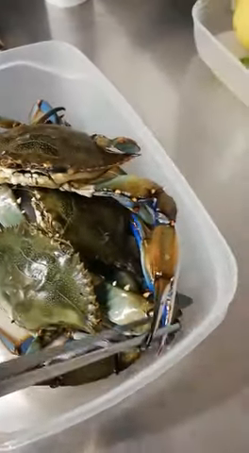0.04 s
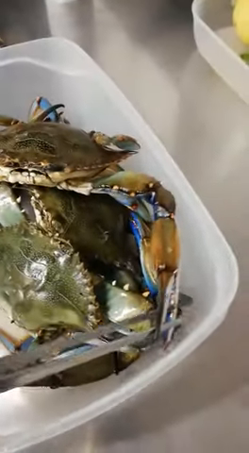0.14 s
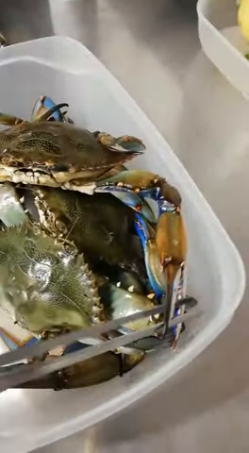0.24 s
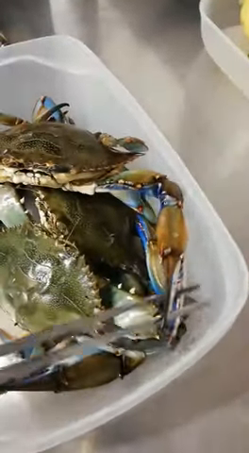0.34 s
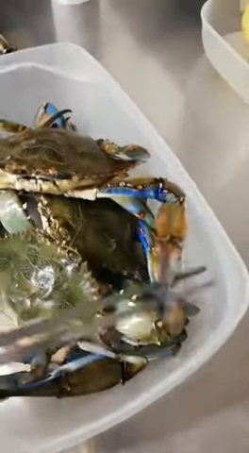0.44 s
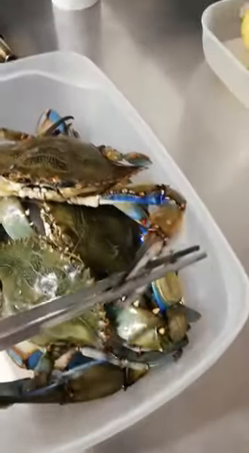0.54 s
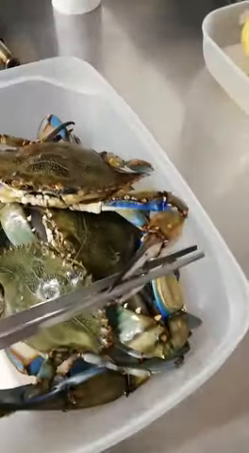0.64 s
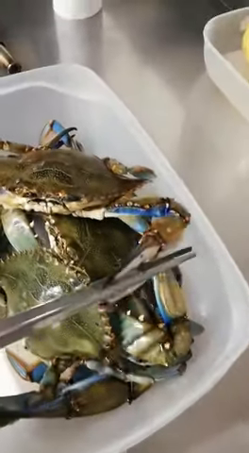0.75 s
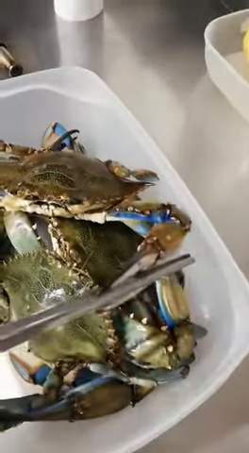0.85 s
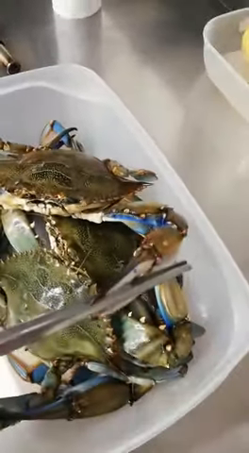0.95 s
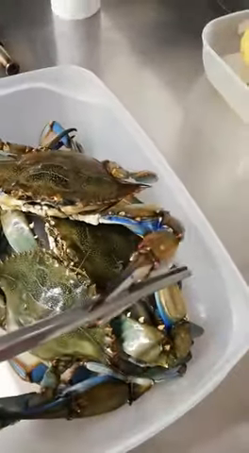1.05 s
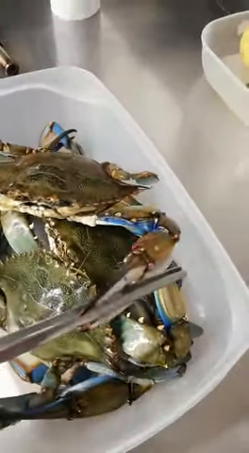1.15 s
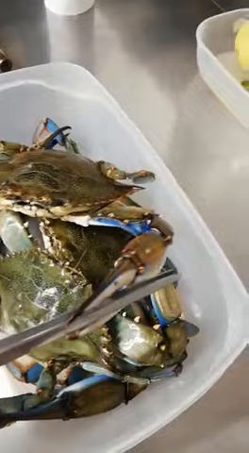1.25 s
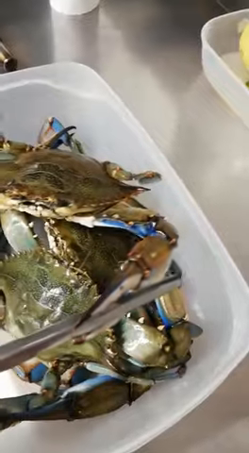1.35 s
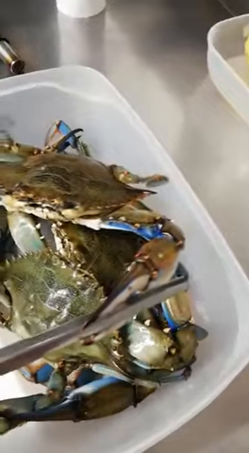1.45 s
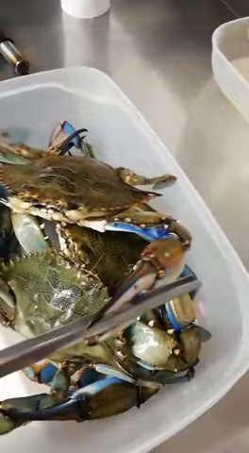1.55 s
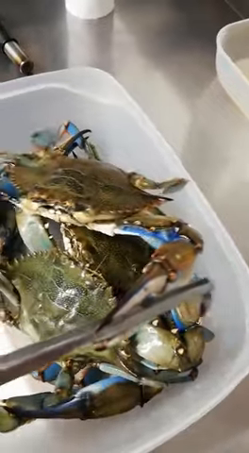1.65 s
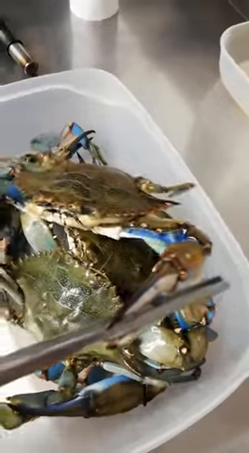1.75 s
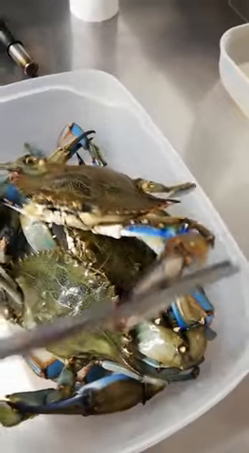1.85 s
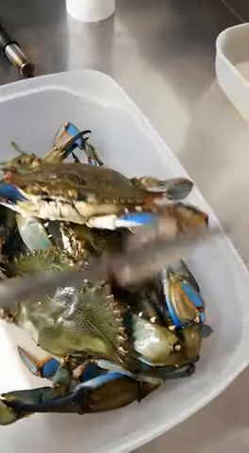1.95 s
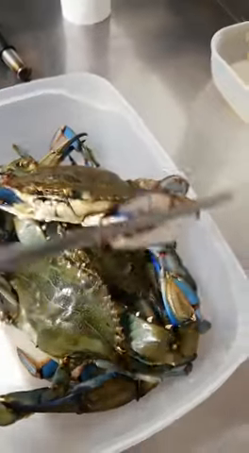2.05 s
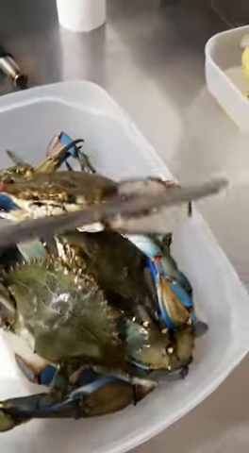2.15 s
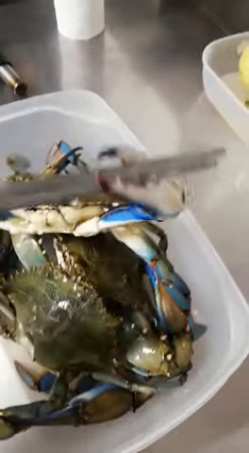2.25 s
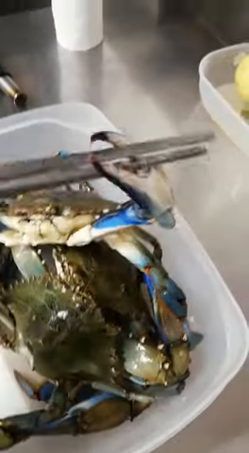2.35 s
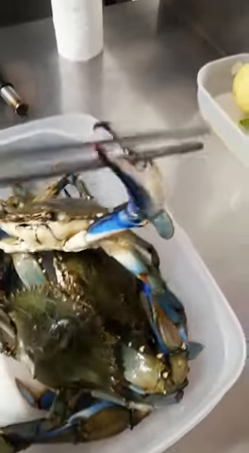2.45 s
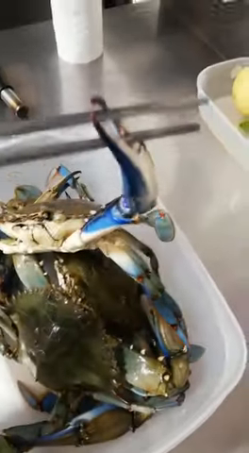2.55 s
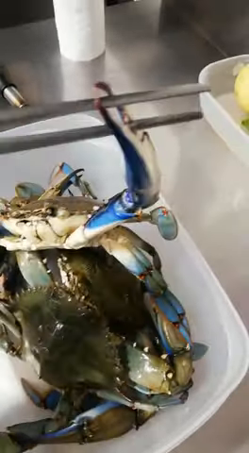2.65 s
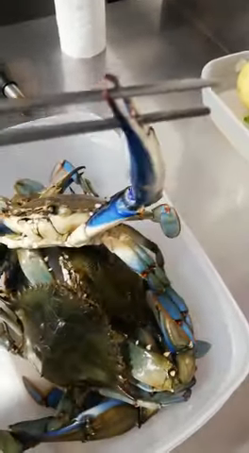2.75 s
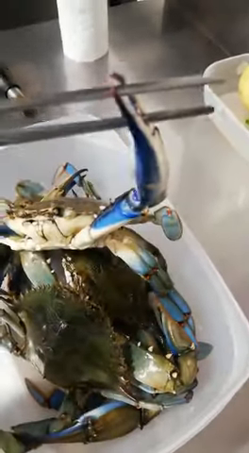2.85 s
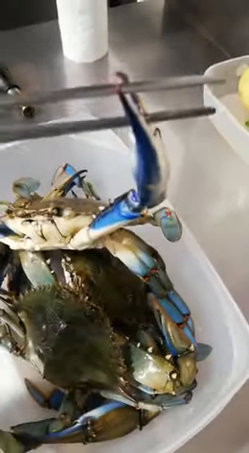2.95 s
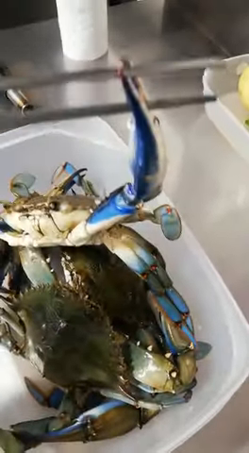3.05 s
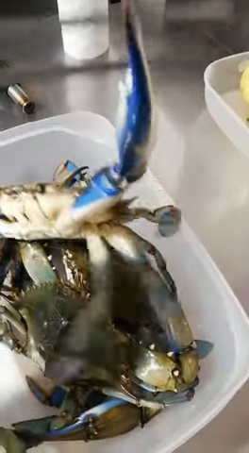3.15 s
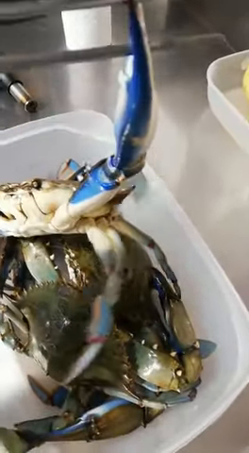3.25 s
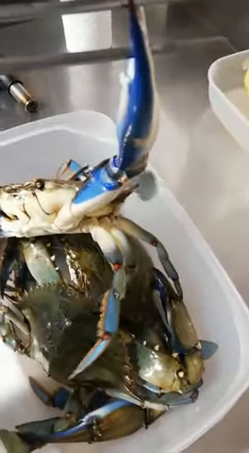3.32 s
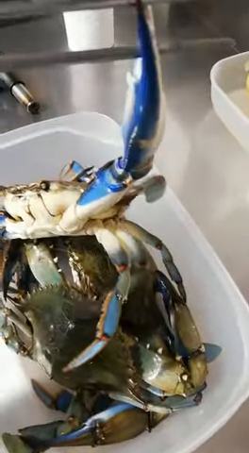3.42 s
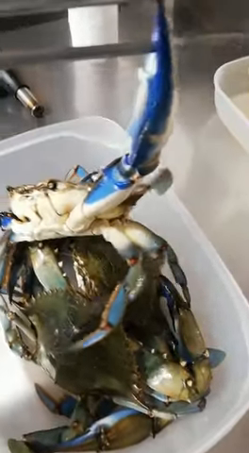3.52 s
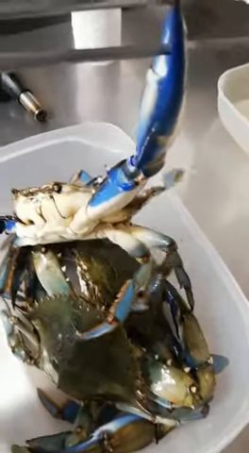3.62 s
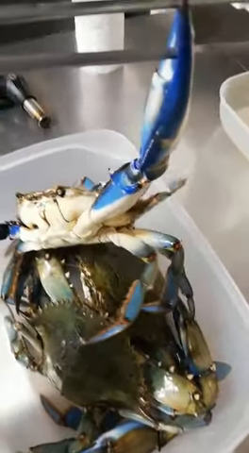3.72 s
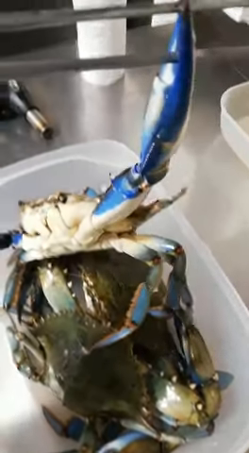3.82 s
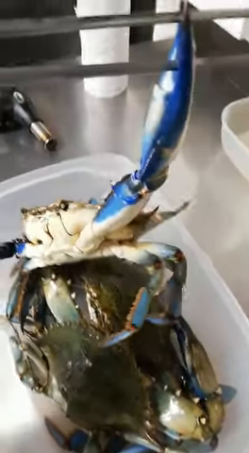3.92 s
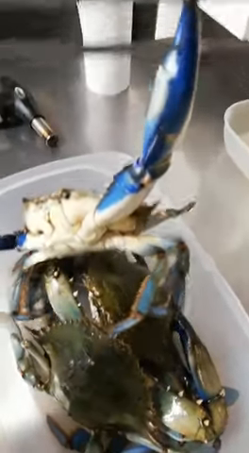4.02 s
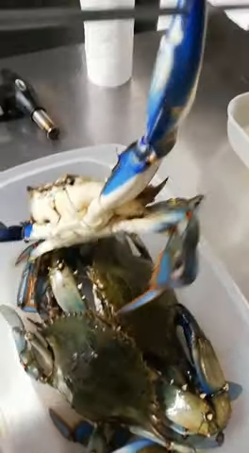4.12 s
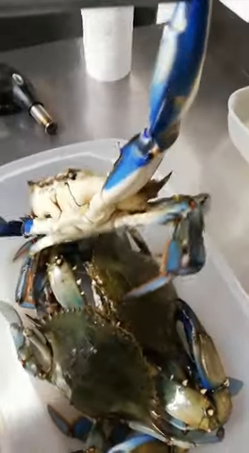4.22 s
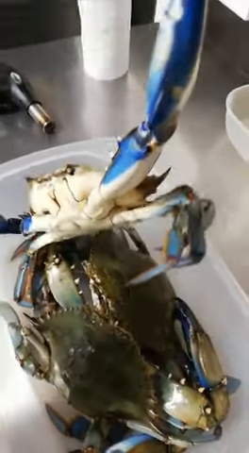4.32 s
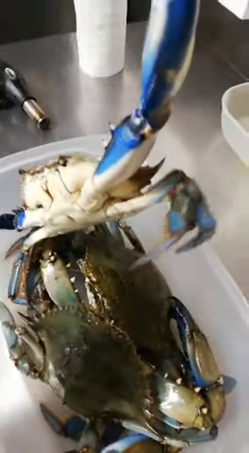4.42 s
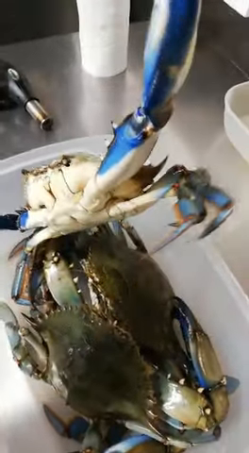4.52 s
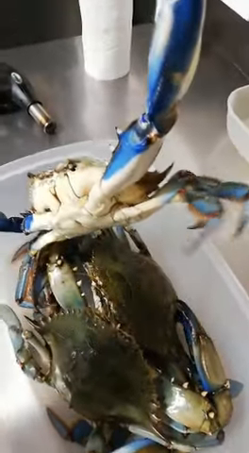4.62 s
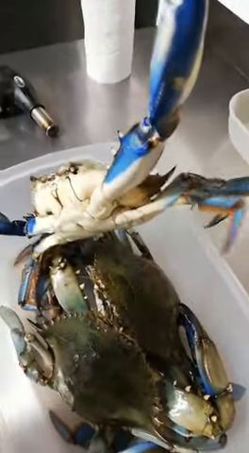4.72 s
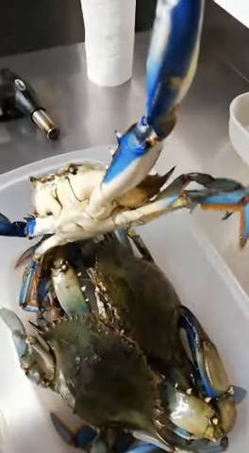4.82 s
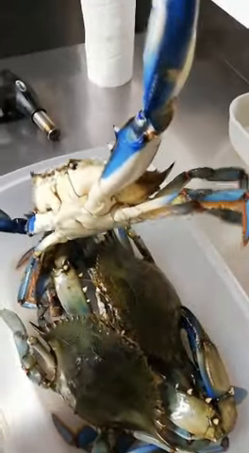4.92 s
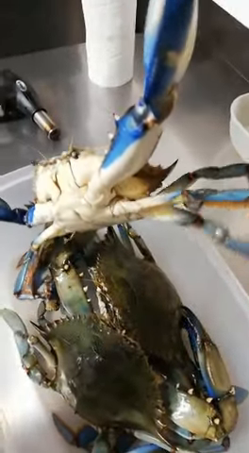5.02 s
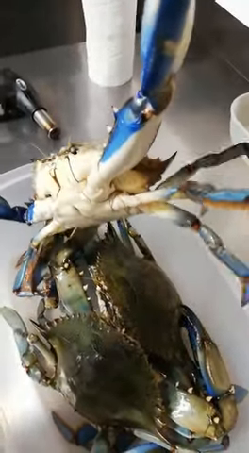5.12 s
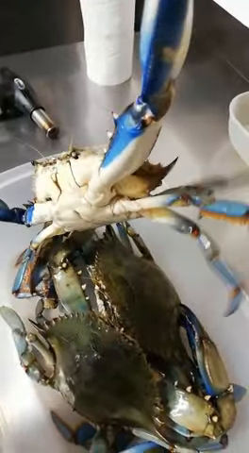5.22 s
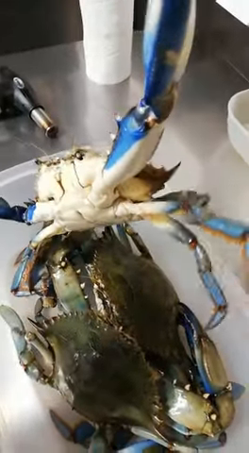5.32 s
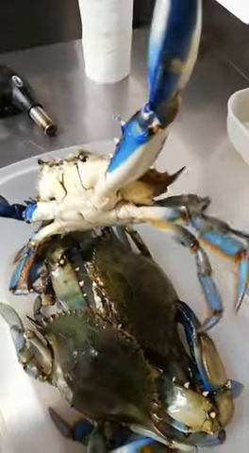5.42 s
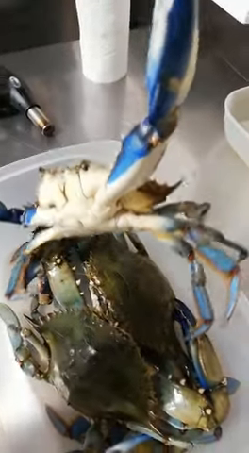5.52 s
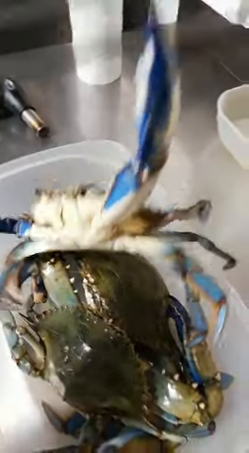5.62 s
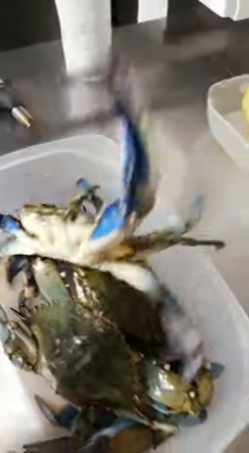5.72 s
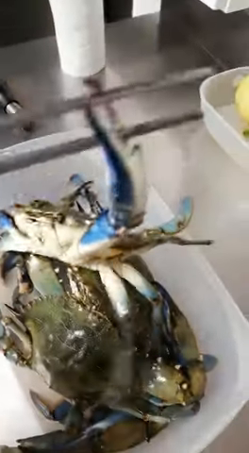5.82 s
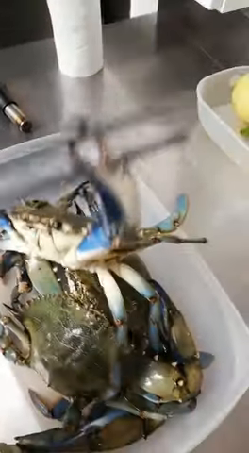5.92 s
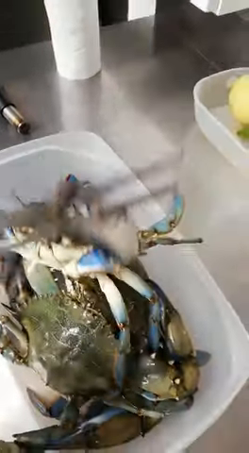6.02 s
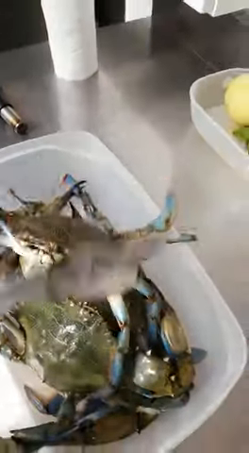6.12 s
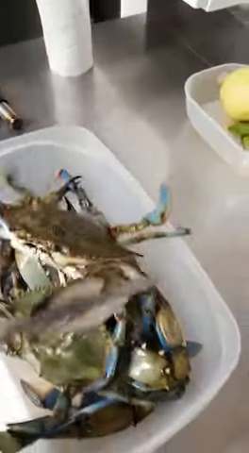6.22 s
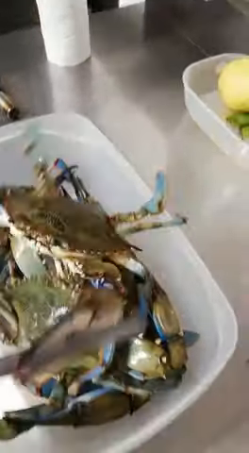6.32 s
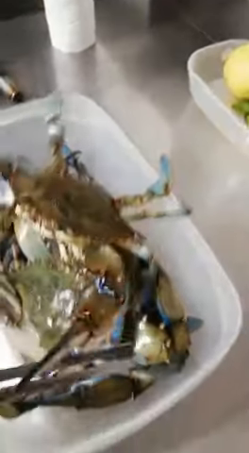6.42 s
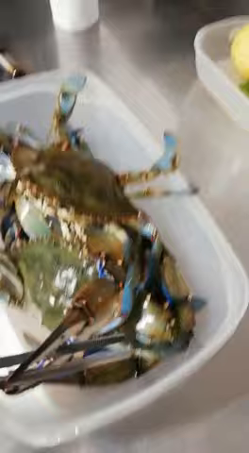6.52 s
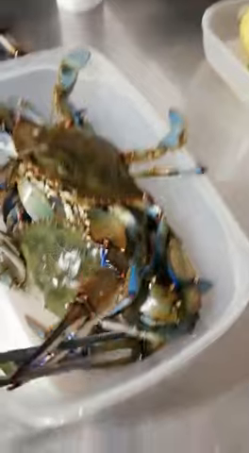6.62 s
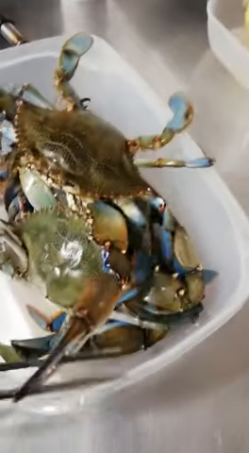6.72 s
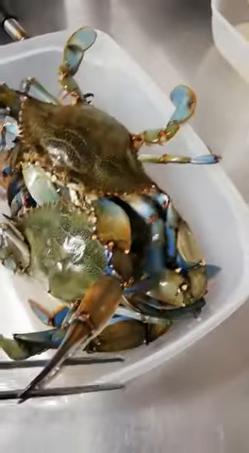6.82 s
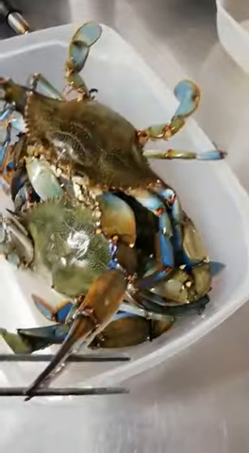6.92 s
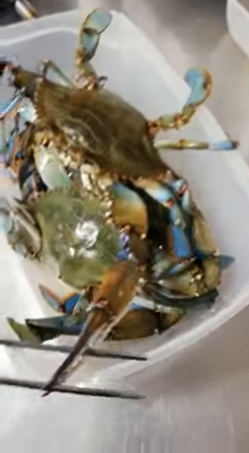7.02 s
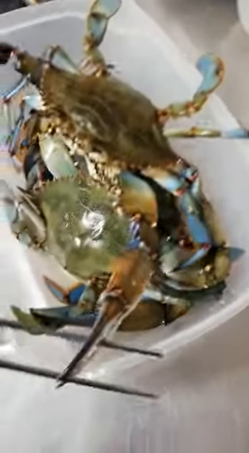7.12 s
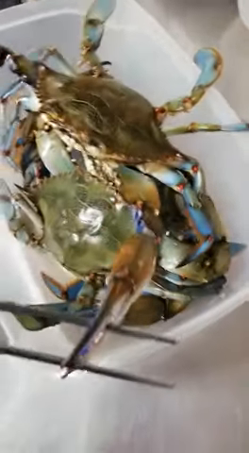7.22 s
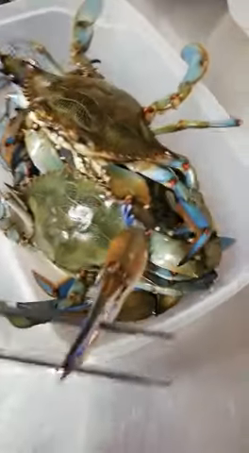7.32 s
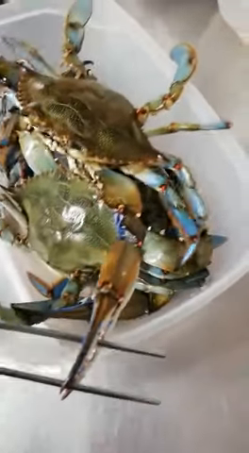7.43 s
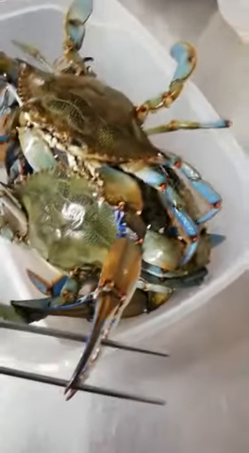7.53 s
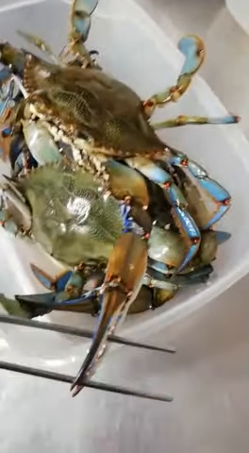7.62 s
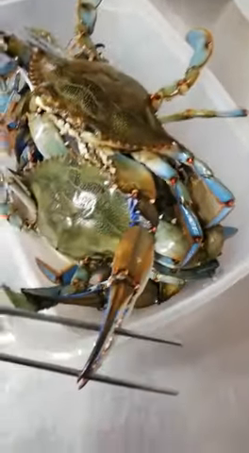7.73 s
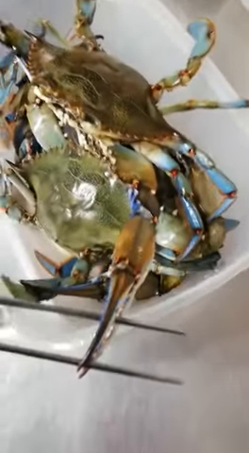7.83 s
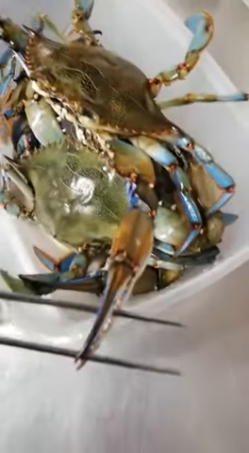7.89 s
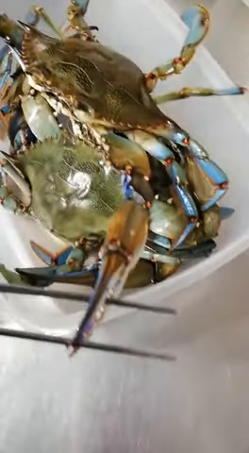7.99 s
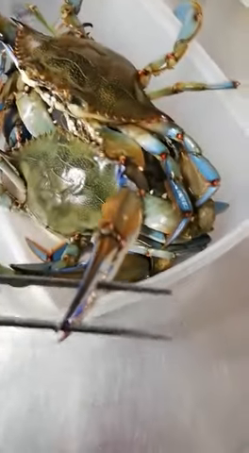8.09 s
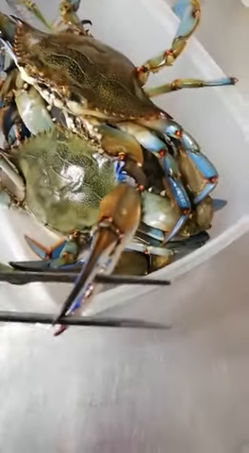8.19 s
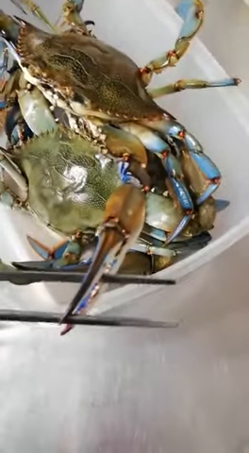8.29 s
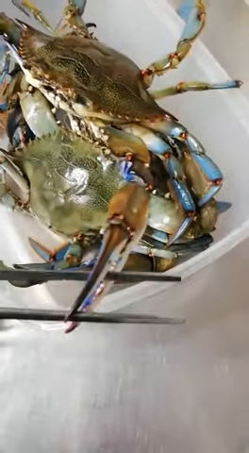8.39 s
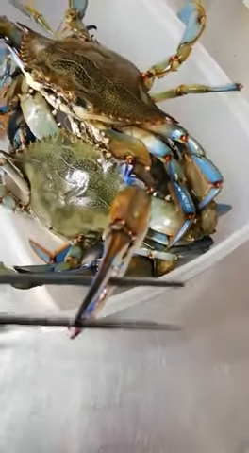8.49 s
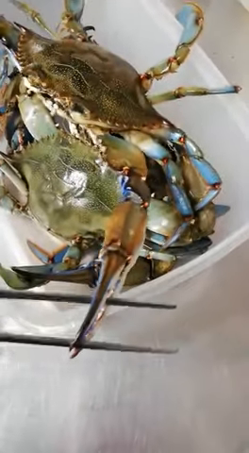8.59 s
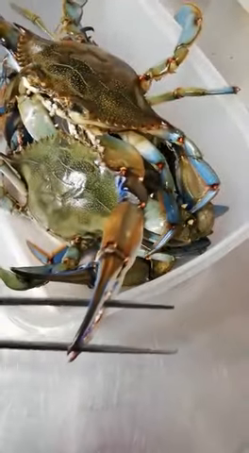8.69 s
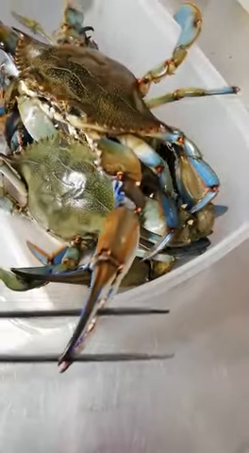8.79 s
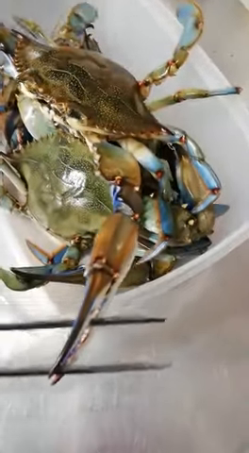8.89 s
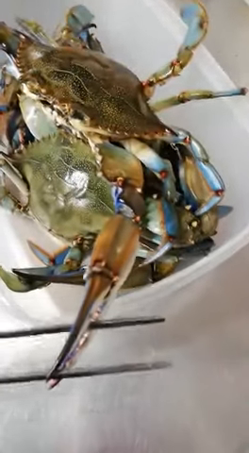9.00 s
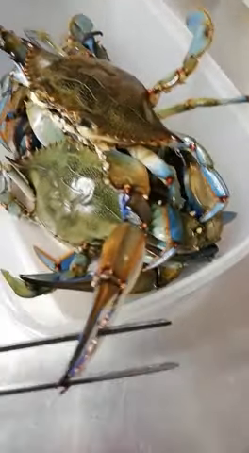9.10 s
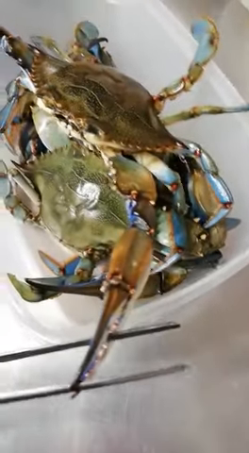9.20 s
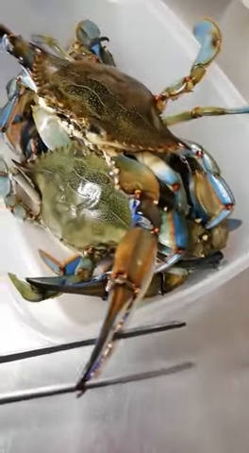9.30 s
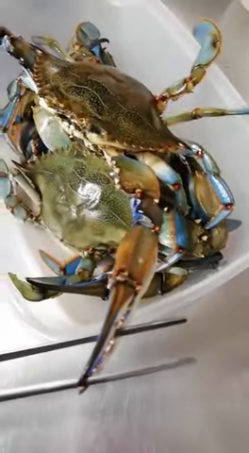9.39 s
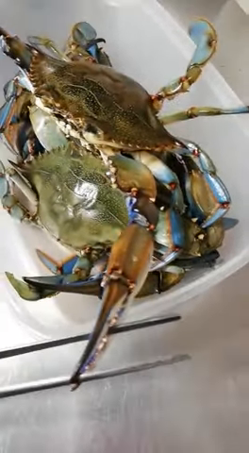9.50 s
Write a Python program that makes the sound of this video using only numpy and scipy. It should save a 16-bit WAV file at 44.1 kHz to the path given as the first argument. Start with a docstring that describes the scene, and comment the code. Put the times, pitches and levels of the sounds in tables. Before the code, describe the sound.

Live crabs shift in a plastic tub on a steel counter, heard close up. An opening knock and scratchy metallic tong slips give way to small shell taps, sharp clicks and short dry leg drags. The hardest clack comes past the middle, followed by sparse hollow thuds. Fine bubbling froth and low fridge hum continue, with short room echoes.

```python
"""Crab shells knock, clack and scrape on a plastic tub as live crabs are shifted about on a steel counter.
Blows and rubs are short bursts of shaped noise that shake the tub; its ringing is a set of fading tones.
Steel tongs tick and rasp against a claw in small jerks, and wet mouthparts pop as brief blips of noise.
A refrigerator hums in the small, hard room: wavering tones over a steady rush of noise, with room echoes."""
import sys
import numpy as np
from scipy import signal
from scipy.fft import rfft, irfft
from scipy.io import wavfile
from scipy.ndimage import uniform_filter1d

SR = 44100
rng = np.random.default_rng(int(sys.argv[2]) if len(sys.argv) > 2 else 0)


def put_to_file(sound):
    """Save the sound as 16-bit audio at rate SR, in the file named by the first command-line argument."""
    columns = np.atleast_2d(sound).T  # one column per channel
    safe = np.clip(columns, -1, 1)
    whole_steps = np.round(safe * 32767)
    wavfile.write(sys.argv[1], SR, whole_steps.astype(np.int16))


N = 421145  # length of the scene in samples
SIZE = 8192  # length of one short burst in samples
T = np.arange(SIZE) / SR  # time within a burst, in seconds
TOP_HZ = 16200  # highest treble kept

# Shell striking plastic: start_s, level_db, pitch_hz of the struck patch, click_db relative to the blow
KNOCK_EVENTS = [(0.047, -10, 1660, -10), (0.075, 3, 1000, -4), (0.634, -13, 1143, -17),
                (1.36, -21.5, 1450, -5), (1.528, -7.5, 1070, -17), (1.595, -10.5, 1350, -5.5),
                (1.662, -13, 850, -14), (1.68, -9, 1100, -4.5), (1.741, -14.5, 1000, -14),
                (1.826, -15, 1000, -23), (1.838, -17.5, 1680, -16), (1.916, -7, 1420, -7.5),
                (2.27, -15.5, 990, -2.5), (2.297, -12, 1470, -14), (2.477, -15.5, 930, -6),
                (2.719, -13, 1480, -17), (3.194, 4, 1084, -15), (3.231, -14.5, 1910, -1.5),
                (4.033, 4.5, 1480, -19.5), (4.109, -5.5, 1243, -19), (5.627, -5.5, 870, -22),
                (5.728, -11, 320, -26), (5.764, -4.5, 680, -28), (6.0939, 15, 1575, -7),
                (6.106, 0, 1235, -15), (6.487, -17.5, 1670, -7), (6.758, -10.5, 1707, -3),
                (6.8299, 1, 328, -0.5), (7.166, -20.5, 940, -12), (7.443, 4.5, 534, -8),
                (7.531, -13.5, 1650, -19), (7.559, -13, 800, -29), (8.634, 4, 440, -15)]
# Steel tongs on a claw: start_s, level_db, slip_s (length of the slip), pitch_hz of the arm's brightest ring
TONG_SLIPS = [(0.008, -11.5, 0.0047, 10100), (0.185, -9, 0.02, 9600), (0.229, -4.5, 0.025, 7900),
              (0.26, -19, 0.0059, 8800), (0.3044, -7, 0.015, 7900), (0.316, -5, 0.032, 8450),
              (0.37, -6, 0.012, 8800), (0.412, -10, 0.017, 8360), (0.452, -3.5, 0.036, 8250),
              (0.49, 5, 0.044, 9800), (2.152, 9, 0.0034, 7360), (2.362, -8, 0.0079, 8200),
              (2.489, -11.5, 0.0093, 9550), (2.5155, 6, 0.0073, 10100), (2.544, -10, 0.0027, 9500),
              (2.983, -13, 0.0049, 10700), (3.115, -16, 0.0053, 12400), (3.157, -13, 0.032, 10000),
              (5.037, 9.5, 0.004, 8480), (5.552, -15.5, 0.0066, 9200), (6.0803, 2, 0.003, 9300),
              (7.715, -17, 0.0016, 10600)]
# Legs dragged over plastic: hardest_press_s, build_s, fade_s, level_db, pitch_hz of the rubbed wall
LEG_SCRAPES = [(0.16, 0.082, 0.034, -42.5, 1400), (0.51, 0.24, 0.063, -49, 1520),
               (1.66, .17, 0.32, -54.5, 1070), (3.2, 0.073, 0.21, -54.5, 1278),
               (3.65, 0.28, 0.25, -62, 955), (4.047, 0.024, 0.021, -40, 1350),
               (4.13, 0.07, 0.23, -53, 1000), (5.035, 0.092, 0.032, -40.5, 875),
               (5.6, .065, 0.12, -40, 1170), (5.74, 0.033, 0.066, -41, 750),
               (6.054, 0.029, 0.033, -43.5, 860), (6.47, 0.13, 0.29, -55.5, 1090)]
# A hollow claw hitting another shell: start_s, level_db
CLAW_CLACKS = [(4.033, -13), (5.038, 1.5), (6.081, 2), (6.0949, 11), (7.449, -12), (8.635, -0.5)]
# Larger bubbles at the crabs' mouths: start_s
BUBBLE_TIMES = [0.757, 3.858, 4.274, 4.414, 4.642, 4.81, 5.468, 5.541, 6.327, 6.45, 7.347, 8.02, 8.301,
                8.393, 8.488, 8.586, 8.888]

# Colour of the tub wall when struck: frequency_hz, gain_db
WALL_COLOUR = [(100, -48), (550, -12), (1100, 4), (1600, 6.5), (2100, -3.5), (2400, -5), (2850, -1.5),
               (5200, -29)]
# Colour of the tub floor's thump: frequency_hz, gain_db
THUD_COLOUR = [(50, -12), (140, 7.5), (280, 2), (370, 13), (490, -14), (720, -4), (1000, -19.5), (2050, -3),
               (3700, -14), (4500, -33.5)]
# Colour of the click on the shell: frequency_hz, gain_db
CLICK_COLOUR = [(500, 2), (2500, -3), (4000, 4), (6000, -3), (10200, 0.5), (16000, -24.5)]
# Colour of scuffed steel and hissing spines: frequency_hz, gain_db
STEEL_COLOUR = [(500, -63), (3000, -31), (5400, -4), (8800, -1), (10200, 6), (13000, -7), (16000, -21)]
# Colour of hollow shell: frequency_hz, gain_db
SHELL_COLOUR = [(380, -4.5), (1550, 2), (2200, -3.5), (3000, -1.5), (7000, -10), (16000, -50)]
# Colour of a leg rubbing the tub: frequency_hz, gain_db
DRAG_COLOUR = [(150, -42), (380, -1.5), (1400, 2), (2100, -19), (4500, -19), (14000, -69)]

# Ringing tones of the tub: pitch_hz, relative_level_db
TUB_RINGS = [(327, -3), (704, -1), (1052, 6), (1180, -6), (1560, 1), (1640, 13.5), (2770, -6)]
TUB_T60_S = 0.18  # time for the tub's ring to fall by 60 dB
# Ringing tones of the tongs: pitch_hz, relative_level_db, t60_s (time to fall by 60 dB when let ring)
TONG_RINGS = [(6320, 0, 0.23), (7430, 0, 0.087), (8710, 3.5, 0.12), (9220, 5.5, 0.072), (10040, 1.5, 0.55)]

# Refrigerator tones: pitch_hz, level_db (rms, before they waver)
HUM_TONES = [(61.5, -64.5), (119.5, -58.5), (186.3, -61.5), (338.5, -63), (371, -66.5)]
# Rush of the fan and kitchen air: frequency_hz, relative_level_db (per Hz)
AIR_COLOUR = [(25, 1.5), (55, 4), (180, 3.5), (370, -3), (480, -14.5), (950, -11), (2800, -19.5),
              (6500, -27), (8800, -27.5), (10200, -20.5), (12500, -35.5)]
AIR_DB = -53  # rms level of that rush
# Fading of the room's echoes: frequency_hz, t60_s
ROOM_FADE = [(300, 0.41), (1200, 0.35), (15000, 0.28)]
# Width of the microphone pair, narrow in the bass: frequency_hz, side_gain_db
STEREO_WIDTH = [(85, -21.5), (280, -5), (520, 7.5), (1200, -3), (3000, 0.5)]
# Balance of the tub and tongs between the microphones: frequency_hz, left_minus_right_db
NEAR_BALANCE = [(300, -5), (650, 7), (1400, -0.5), (2900, -8), (6000, 2.5), (9000, 7)]

# The lower a patch sounds, the nearer it lies to the tub floor and the more the floor thuds
THUD_EVEN_HZ, THUD_DB_PER_OCTAVE = 577, 7.5
# A hard, short snap rings the steel; a light, long slip brings out the hollow shell
SHELL_DB, SHELL_DB_PER_DB, SHELL_DB_PER_DOUBLING, USUAL_SLIP_S = -8.5, -0.62, 4, 0.0087
# The hiss of the spines follows the level of the scrape
SPINES_DB, SPINES_DB_PER_DB = -29.5, 1
# A leg pressed hard catches more often: base rate, the level it belongs to, and how it grows with level
CATCHES_PER_S, FIRM_PRESS_DB, CATCH_RATE_DB_PER_DB = 520, -41, 0.3
CATCH_S = 0.0022  # fading time of one catch


def undb(db):
    """Turn decibels into gain."""
    return 10 ** (np.asarray(db) / 20)


def along(points, hz):
    """Read a table of (Hz, value) at any frequency, in even steps of pitch."""
    f, value = np.transpose(points)
    return np.interp(np.log(np.maximum(hz, 1)), np.log(f), value)


def bins(size):
    """List the frequencies in a spectrum of this many samples."""
    return np.fft.rfftfreq(size, 1 / SR)


def unit(x):
    """Scale to rms 1."""
    return x / np.sqrt(np.mean(x ** 2))


def through(x, response):
    """Pass a sound through something that answers a single tap with this response."""
    return signal.fftconvolve(x, response, axes=-1)[:, :x.shape[-1]]


def colour(x, points):
    """Filter by a table of (Hz, dB), with no sound ahead of its cause."""
    cepstrum = irfft(np.log(undb(along(points, bins(SIZE)))))
    # Folding the second half onto the first puts the filter's energy as early as possible
    cepstrum[1:SIZE // 2] *= 2
    cepstrum[SIZE // 2 + 1:] = 0
    response = irfft(np.exp(rfft(cepstrum)))
    return through(x, response[None])


def resonance(x, hz, sharpness):
    """Let through a band around one pitch, with gain 1 at its centre."""
    b, a = signal.iirpeak(min(hz, TOP_HZ), sharpness, fs=SR)
    return signal.lfilter(b, a, x)


def add(track, s, sound):
    """Mix a sound into a track at a time in seconds."""
    i = max(int(s * SR), 0)
    track[:, i:i + sound.shape[-1]] += sound[:, :N - i]


def walk(rate):
    """Make a smooth random wander of rms 1, with about this many new values a second."""
    k = int(SR / rate)
    steps = np.repeat(rng.standard_normal(N // k + 1), k)
    smooth = uniform_filter1d(uniform_filter1d(steps, k), k)
    return unit(smooth[:N])


def burst(envelope, shared, size=60):
    """A crowd of quickly damped vibrations, broadly even in colour, partly alike on both sides."""
    noise = rng.standard_normal((3, SIZE))
    spectrum = rfft((noise[:2] + shared * noise[2]) * envelope)
    # A wider span leaves more resonances standing
    power = uniform_filter1d(np.abs(spectrum) ** 2, size=size)
    return irfft(spectrum / np.sqrt(power)) * (T < T[-1] / 2)


def ring(modes, grip=1):
    """Tones that fade after a tap, unit energy; a firm contact damps them grip times faster."""
    t = np.arange(SR // 2) / SR
    total = 0
    for hz, db, t60 in modes:
        phase = 0.66 * rng.random((2, 1))
        total = total + undb(db - 60 * grip * t / t60) * np.sin(2 * np.pi * (hz * t + phase))
    return unit(total) / np.sqrt(len(t))


def kitchen(waver_db=2.5, drift=0.14, lag_s=0.00032):
    """The refrigerator's tones waver in level and pitch over the rush of its fan."""
    noise = rfft(rng.standard_normal((2, N)))
    air = unit(irfft(noise * undb(along(AIR_COLOUR, bins(N))), N))
    # The left side hears the hum later, so it comes from the right
    arrival = np.arange(N) / SR - np.array([[lag_s], [0]])
    hum = 0
    for hz, db in HUM_TONES:
        level = undb(db + waver_db * walk(9)) * np.sqrt(2)
        wander = drift * np.sqrt(hz / 10) * walk(10)
        hum = hum + level * np.sin(2 * np.pi * hz * arrival + wander)
    return undb(AIR_DB) * air + hum


def jerks(slip_s, gap_s=0.0022, uneven=0.7, scatter_db=3.0):
    """The catches of one slip, unevenly spaced, hold and then weaken until it stops; unit energy."""
    pace, size = np.clip(rng.standard_normal((2, SIZE // 16)), -2, 2)
    times = np.cumsum(gap_s * np.exp(uneven * pace))
    times = times - times[0]
    done = np.minimum(times / slip_s, 1)
    force = undb(scatter_db * size) * (1 - done ** 2)
    taps = np.bincount((times * SR).astype(int), force, SIZE)[None, :SIZE]
    return unit(taps) / np.sqrt(SIZE)


def tongs(bite_s=0.00038, catch_s=0.0026, ring_db=-31, held_db=-10, grip=9,
          broad_db=-7, bright_db=-1, sharpness=2.77, scuff_db=-2.0):
    """Steel jerks over one spot of spiny shell: short slips tick, long ones rasp, and the arms ring on."""
    steel, shell = np.zeros((2, 2, N))
    for s, db, slip_s, hz in TONG_SLIPS:
        shell_db = SHELL_DB + SHELL_DB_PER_DB * db
        shell_db += SHELL_DB_PER_DOUBLING * np.log2(slip_s / USUAL_SLIP_S)
        envelope = (1 - np.exp(-T / bite_s)) * np.exp(-T / catch_s)
        spot = burst(envelope, shared=0.43, size=170)
        contact = undb(db) * through(spot, jerks(slip_s))
        bright = resonance(contact, hz, sharpness)
        add(steel, s, undb(broad_db) * contact + undb(bright_db) * bright)
        add(shell, s, undb(shell_db) * contact)
    # The arms ring briefly where they are held and longer where they are free
    arms = undb(held_db) * ring(TONG_RINGS, grip) + undb(ring_db) * ring(TONG_RINGS)
    scuff = undb(scuff_db) * colour(steel, STEEL_COLOUR)
    return scuff + through(steel, arms) + colour(shell, SHELL_COLOUR)


def knocks(wall_s=0.0048, thud_s=0.0073, click_s=0.0028, panel_s=0.001, panel_db=-9,
           floor_db=-1, floor_sharpness=0.92, ring_db=-15, contact_s=0.00061):
    """Each blow clicks on shell, flexes the tub wall, thumps its floor and leaves the tub ringing."""
    wall, thud, click, panel, push = np.zeros((5, 2, N))
    contact = 1 - np.exp(-T / contact_s)
    for s, db, hz, click_db in KNOCK_EVENTS:
        thud_db = db + THUD_DB_PER_OCTAVE * np.log2(THUD_EVEN_HZ / hz)
        thump = undb(thud_db) * burst(contact * np.exp(-T / thud_s), shared=0)
        add(wall, s, undb(db) * burst(contact * np.exp(-T / wall_s), shared=0.4))
        add(thud, s, thump)
        # The floor also answers at the pitch of the struck patch
        floor = resonance(resonance(thump, hz, floor_sharpness), hz, floor_sharpness)
        add(panel, s, undb(floor_db) * floor)
        snap = burst(contact * np.exp(-T / click_s), shared=0.55, size=400)
        add(click, s, undb(db + click_db) * snap)
        flex = T * np.exp(-T / panel_s) * np.sin(2 * np.pi * hz * T)
        add(panel, s, undb(db + panel_db) * unit(flex[None]) / np.sqrt(SIZE))
        add(push, s, undb([[db + ring_db]]))  # a single tap that sets the tub ringing
    blows = colour(wall, WALL_COLOUR) + colour(thud, THUD_COLOUR) + colour(click, CLICK_COLOUR) + panel
    tub_ring = ring([(hz, db, TUB_T60_S) for hz, db in TUB_RINGS])
    return blows, through(push, tub_ring)


def pop(hz, pop_s):
    """A brief rough blip: fading noise narrowed to a band round one pitch."""
    crack = rng.standard_normal((2, SIZE // 8)) * np.exp(-T[:SIZE // 8] / pop_s)
    return resonance(resonance(crack, hz, 4), hz, 4)


def scrapes(uneven=0.5, scatter_db=2.5, drag_db=5, panel_db=9, bumps_per_s=75, bump_db=28,
            bump_spread=0.49):
    """Leg tips stick and slip, shaking a patch of tub, while spines hiss and knobs of shell bump along."""
    drag, panel, hiss, bumps = np.zeros((4, 2, N))
    for top, build_s, fade_s, db, hz in LEG_SCRAPES:
        start = top - build_s
        rate = CATCHES_PER_S * undb(CATCH_RATE_DB_PER_DB * (db - FIRM_PRESS_DB))
        pace, size = np.clip(rng.standard_normal((2, SIZE // 16)), -2, 2)
        times = start + np.cumsum(np.exp(uneven * pace)) / rate
        pressure = np.interp(times, [start, top, top + fade_s], [0, 1, 0])
        # Denser catches are each made weaker, to keep the overall level
        force = pressure * undb(scatter_db * size) * np.sqrt(SR / rate)
        slips = np.bincount(((times - start) * SR).astype(int), force, SR)[:SR]
        fade = unit(np.exp(-T / CATCH_S))[None] / np.sqrt(SIZE)
        shudder = through(slips[None], fade) * rng.standard_normal((2, SR))
        add(drag, start, undb(db) * shudder)
        add(panel, start, undb(db) * resonance(resonance(shudder, hz, 1.66), hz, 1.66))
        add(hiss, start, undb(SPINES_DB + SPINES_DB_PER_DB * db) * shudder)
        # Some catches, picked at random, are knobs bumping, each at its own pitch
        chances = rng.random((len(times), 2))
        shifts = 2 * bump_spread * rng.standard_normal(len(times))
        bump_gain = undb((db + FIRM_PRESS_DB) / 2 + bump_db)
        for s, press, (luck, weight), octaves in zip(times, pressure, chances, shifts):
            if press > 0 and luck < bumps_per_s / rate:
                bump = pop(hz * 2 ** np.clip(octaves, -.5, 2), CATCH_S)
                add(bumps, s, bump_gain * press * weight * bump)
    rub = undb(drag_db) * colour(drag, DRAG_COLOUR) + undb(panel_db) * panel
    return colour(bumps, SHELL_COLOUR) + rub + colour(hiss, STEEL_COLOUR)


def froth(count, hz, db, spread, pop_s, cluster_s=0.025):
    """Tiny bubbles burst in pairs, at random, on the wet shells and mouths."""
    out = np.zeros((2, N))
    pairs = np.repeat(rng.uniform(0, N / SR, count), 2)
    times = pairs + rng.exponential(cluster_s, 2 * count)
    variety = np.clip(rng.standard_normal((2 * count, 2)), -2, 1.5)
    for s, (pitch, size) in zip(times % (N / SR), variety):
        add(out, s, undb(db + 4 * size) * pop(hz * np.exp(spread * pitch), pop_s))
    return out


def bubbles(db=-31, pop_s=0.0028, hz=2800, spread=0.055):
    """Larger bubbles stand out of the froth one by one, all close in pitch because close in size."""
    out = np.zeros((2, N))
    for s in BUBBLE_TIMES:
        pitch_hz = hz * np.exp(spread * rng.standard_normal())
        add(out, s, undb(db) * pop(pitch_hz, pop_s))
    return out


def clacks(clack_s=0.0023, hollow_hz=2850, sharpness=4, hollow_db=3, shell_db=-6):
    """Shell meets shell in a short crack that rings the hollow of the claw."""
    crack = np.zeros((2, N))
    for s, db in CLAW_CLACKS:
        add(crack, s, undb(db) * burst(np.exp(-T / clack_s), shared=0))
    hollow = resonance(crack, hollow_hz, sharpness)
    return undb(hollow_db) * hollow + undb(shell_db) * colour(crack, SHELL_COLOUR)


def room(x, wet_db, build_s=0.00069, patchy_db=2.0):
    """Counter and walls return a tail of uneven echoes whose treble dies first."""
    t = np.arange(int(SR * .6)) / SR
    f, tail = bins(len(t)), 0
    noise = rfft(rng.standard_normal((2, len(t))))
    centres = np.transpose(ROOM_FADE)[0]
    # Each row of weights picks one band, blending into its neighbours
    for (hz, t60), weights in zip(ROOM_FADE, np.eye(len(centres))):
        band = irfft(noise * along(np.c_[centres, weights], f), len(t))
        tail = tail + band * undb(-60 * t / t60)
    patches = undb(patchy_db * walk(500)[:len(t)])
    tail = unit(tail * patches * (1 - np.exp(-t / build_s))) / np.sqrt(len(t))
    return undb(wet_db) * through(x, tail)


def aim(x):
    """Give a nearby sound its balance between the two microphones."""
    halves = np.array([[.5], [-.5]])  # half the difference goes to each side
    return irfft(rfft(x) * undb(halves * along(NEAR_BALANCE, bins(N))), N)


def scene():
    """Put tub, tongs and froth together in the humming kitchen."""
    hum = kitchen()
    steel = tongs()
    blows, ringing = knocks()
    tub = blows + scrapes() + clacks()
    pops = froth(count=150, hz=3100, db=-43, spread=.2, pop_s=.0035) + bubbles()
    fizz = froth(count=110, hz=9850, db=-46.0, spread=0.12, pop_s=0.0026)
    echoes = room(tub, wet_db=-6.5) + room(steel, wet_db=-9.5)
    return aim(tub + steel) + ringing + echoes + pops + fizz + hum


def record(dry):
    """Two closely spaced microphones hear the bass nearly alike; the highest treble is cut."""
    mid, side = (dry[0] + dry[1]) / 2, (dry[0] - dry[1]) / 2
    side = irfft(rfft(side) * undb(along(STEREO_WIDTH, bins(N))), N)
    treble_cut = signal.ellip(8, .2, 70, TOP_HZ, fs=SR, output="sos")
    return signal.sosfilt(treble_cut, [mid + side, mid - side])


dry = scene()
out = record(dry)
put_to_file(out)
```